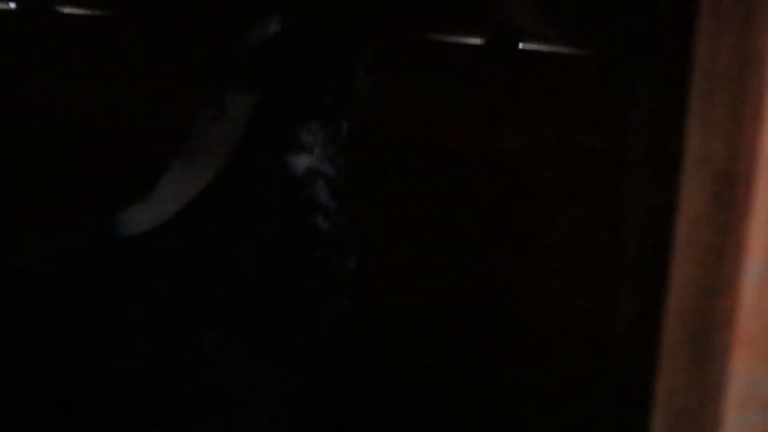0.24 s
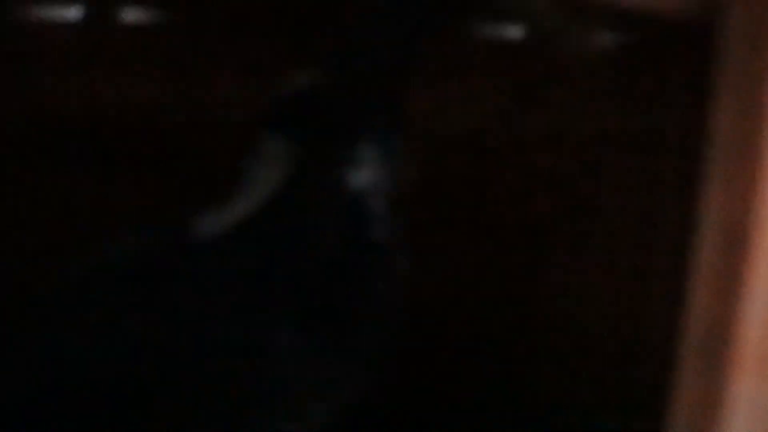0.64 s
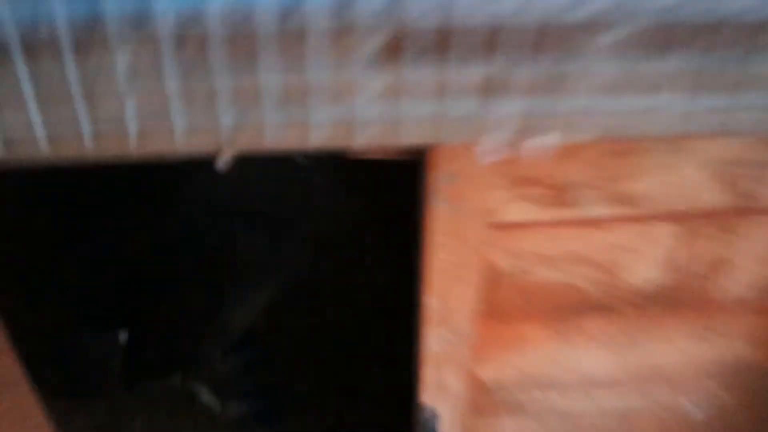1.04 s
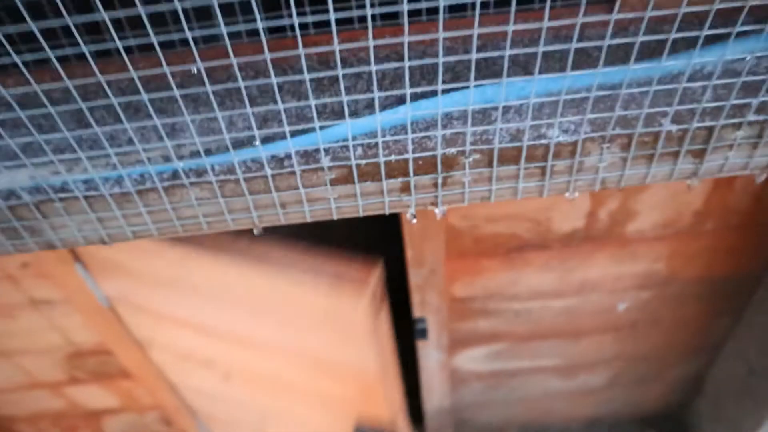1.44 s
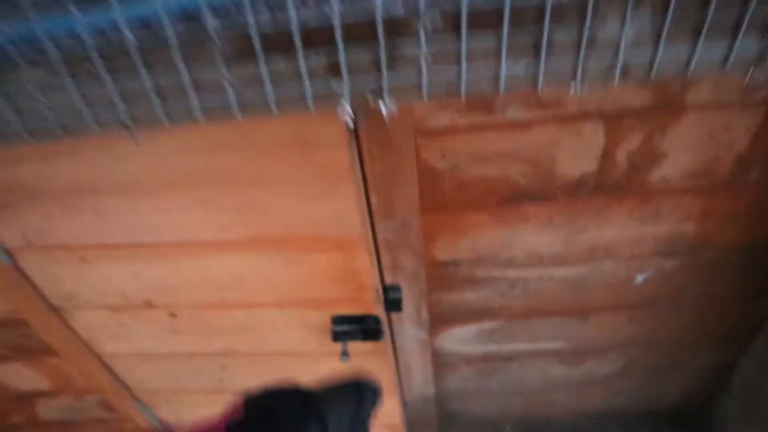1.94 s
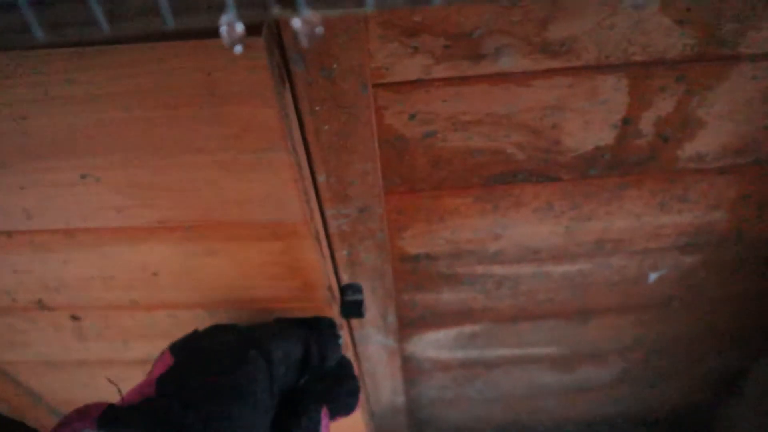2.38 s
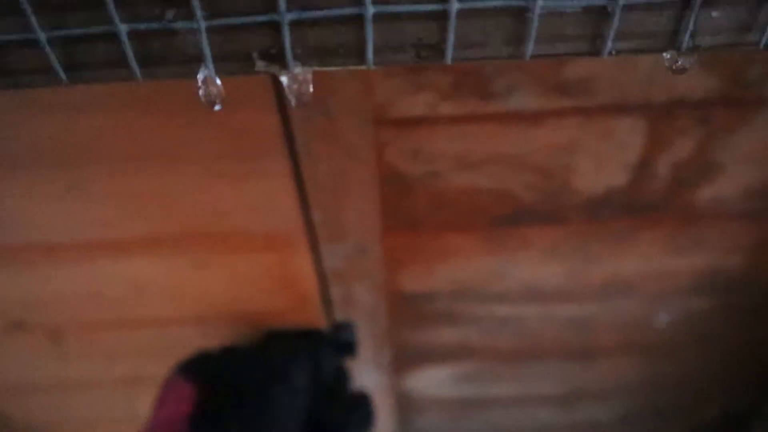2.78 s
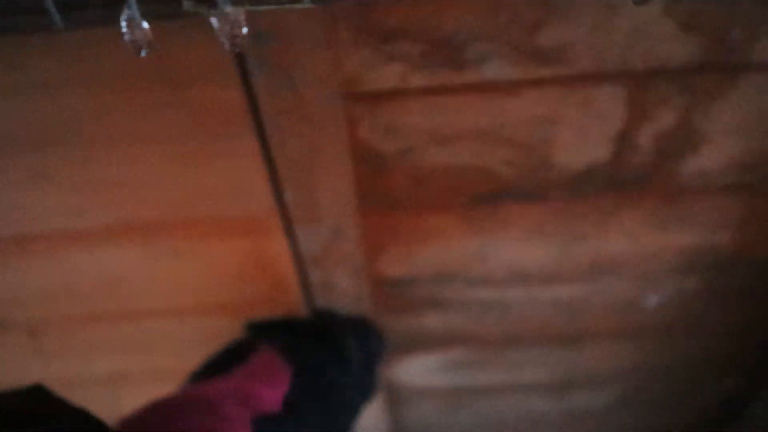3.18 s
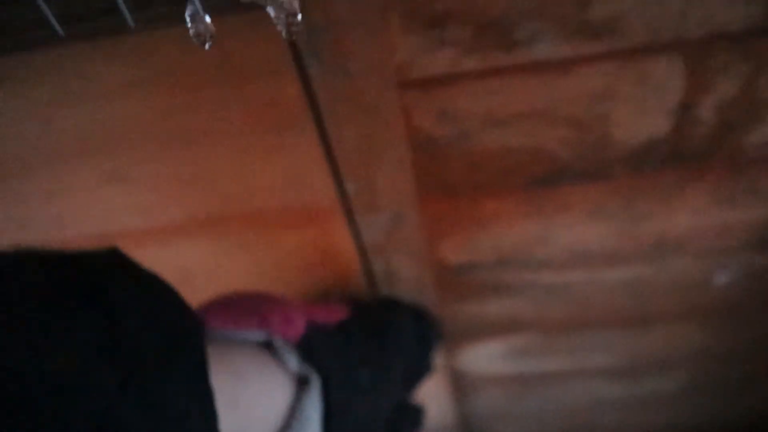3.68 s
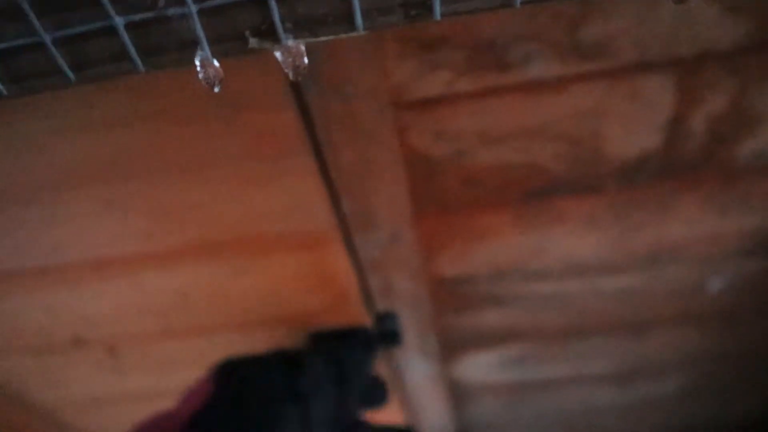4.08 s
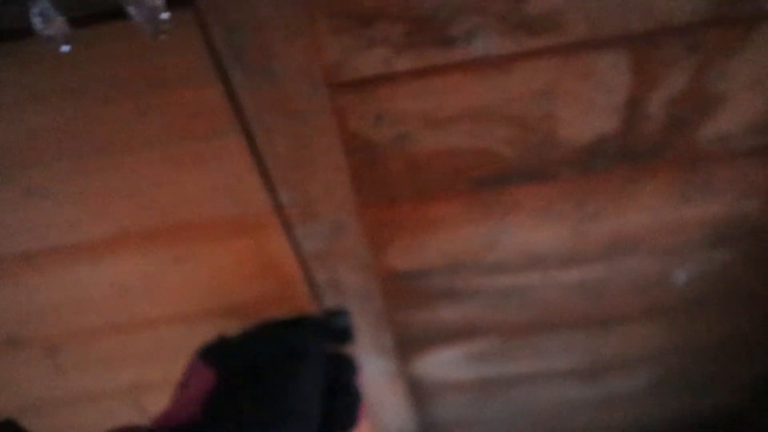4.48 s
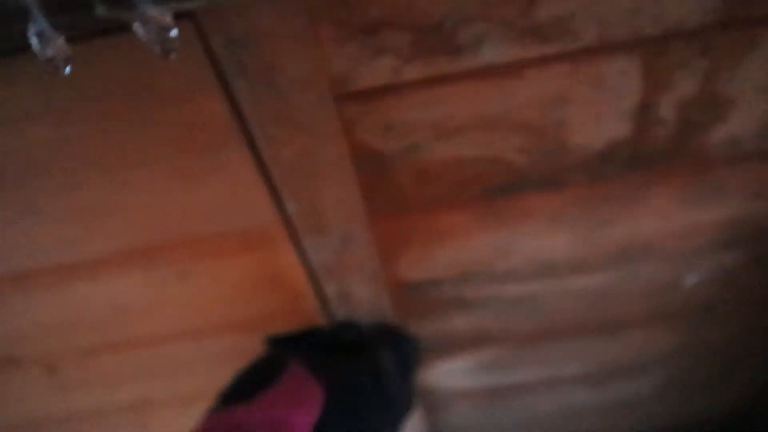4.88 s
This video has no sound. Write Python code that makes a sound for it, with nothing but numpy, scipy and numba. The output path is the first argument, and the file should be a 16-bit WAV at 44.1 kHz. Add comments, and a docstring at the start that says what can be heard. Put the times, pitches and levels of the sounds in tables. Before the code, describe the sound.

Close handheld stereo sound outdoors beside a small wooden duck coop. From the start ducks give short, nasal, buzzing quacks, with small bill smacks, coloured by a boxy wooden resonance and very short tail. Low breeze rumble swells around 0.6 to 1 s, and soft air and faint hiss run throughout. Between about 0.8 and 1.85 s the camera body is bumped repeatedly with dull low knocks, and a sleeve rustles, most clearly near 1.9 s. At about 1.63 s the plank door knocks shut with a hollow double hit. From 2.3 s the quacks become louder, quicker and overlapping, some held longer, near 3.8 and 4.2 s. A sharp latch-and-door clatter comes at 2.5 s. The wall thuds and grinds softly at 2.3, 3.8 and 4.45 s, with a weaker door knock at 4.25 s and a faint bump at 4.7 s. Quacking continues to the end, just past 5 s.

```python
"""Ducks quack inside a small wooden coop: bill smacks, and 65 to 84 syrinx pulses a second that ring
windpipe and bill, coloured by the modes and short tail of the box. A gloved hand knocks door and latch, and
the wall thuds when leaned on. Close to the microphones the camera body is bumped and a sleeve rustles.
Breeze rumble, outdoor air and faint hiss run throughout on a pair of ports widened by a slope difference."""
import sys
import numpy as np
from scipy import signal
from scipy.io import wavfile
from scipy.ndimage import uniform_filter1d
from numba import njit

SR = 44100
rng = np.random.default_rng(int(sys.argv[2]) if len(sys.argv) > 2 else 0)


def wav_out(sig):
    """Save sig, one row per channel (or a flat mono array), as 16-bit PCM at SR to the path in sys.argv[1]."""
    wavfile.write(sys.argv[1], SR, np.round(np.clip(np.atleast_2d(sig).T, -1, 1) * 32767).astype(np.int16))


N = 226089

# All levels are set ahead of the camera's gain and rounding.
# Breeze on the ports: time_s, breeze_db, rumble_over_breeze_db (both flicker around these)
BREEZE = [(0, -51, 1.5), (.6, -43, 2), (.85, -32, 1.5), (1.25, -41.5, -3), (1.65, -37, -5.5),
          (2.05, -45, -18), (3.0, -48.5, -50.5), (4.3, -44.5, -8.5), (5.13, -46, -3)]
# Breeze spectrum: frequency_hz, level_db
BREEZE_COLOUR = [(70, -7), (100, -3), (170, -1), (450, -17)]
# Spectrum of the deepest rumble: frequency_hz, level_db
RUMBLE_COLOUR = [(22, -7), (40, -9.5), (60, 2)]
# Outdoor air spectrum: frequency_hz, relative_level_db
AIR_COLOUR = [(300, -1.5), (600, 8), (800, 25), (1050, 7), (1500, 7.5), (3000, -5), (9000, -22)]
AIR_DB = -48
# Sleeve swishes near the ports: centre_s, half_length_s, level_db
RUSTLES = [(0.887, 0.14, -53.5), (1.288, 0.057, -54.5), (1.882, 0.037, -42.5), (2.28, 0.028, -47),
           (2.928, 0.02, -53.5), (3.596, 0.015, -53.5), (4.44, 0.028, -54), (4.945, 0.49, -63.5)]
# Cloth and hiss spectrum: frequency_hz, level_db
RUSTLE_COLOUR = [(3000, 0), (8000, -8.5), (11000, -1.5), (15000, -21)]
HISS_DB = -62

# Bill smacks: start_s, level_db
SMACKS = [(0.124, -29.5), (0.447, -26.5), (0.697, -25), (1.164, -29), (1.579, -28.5), (1.955, -26.5),
          (2.319, -24), (2.433, -25.5), (2.82, -26.5), (2.948, -25), (3.269, -23.5), (3.426, -25.5),
          (3.765, -24.5), (3.96, -24), (4.209, -22), (4.658, -22), (4.69, -23), (5.084, -27),
          (5.107, -23.5)]
SMACK_HZ = 852.5  # middle of a random spread
# Quacks, which may overlap: start_s, rise_s, hold_s, windpipe_db, drift_over_hold_db,
# windpipe_hz, bill_hz, open_bill_over_windpipe_db, rasp_over_windpipe_db
QUACKS = [ (0.165, 0.14, 0.045, -33.5, -0.5, 1360, 1880, -11.5, -19),
          (.45, 0.023, 0.023, -25, 2.5, 1410, 2020, 2, -18.5),
          (0.698, 0.25, 0.042, -25.5, -7.5, 1249, 1610, -0.5, -14),
          (.705, 0.021, 0.029, -30, 1.5, 1214, 2010, 5.5, -12.5),
          (1.164, 0.059, .006, -25.5, -5, 1430, 1920, -12.5, -19),
          (1.317, 0.039, 0.067, -29, -6, 1395, 1805, 3.5, -8.5),
          (1.397, 0.026, .021, -32, 0.5, 1334, 2165, -0.5, -16),
          (1.582, .035, 0.032, -29, -2, 1415, 1850, 0, -13.5),
          (1.655, 0.12, .025, -30, -7.5, 1430, 1680, -3.5, -15.5),
          (1.892, 0.022, 0.28, -28, 4, 1394, 1910, -4.5, -12.5),
          (2.115, 0.048, 0.023, -31.5, 5.5, 1490, 2150, 9.5, -8),
          (2.326, .035, 0.054, -19.5, -9, 1424, 1810, -1.5, -15.5),
          (2.44, 0.032, 0.12, -18.5, -18, 1454, 2055, 1, -8),
          (2.639, 0.05, 0.042, -22.5, -3, 1442, 2020, -4, -9),
          (2.816, 0.054, 0.04, -24, -10.5, 1388, 1800, -6, -18),
          (2.944, 0.043, 0.082, -22.5, -0.5, 1427, 1835, 2, -10.5),
          (3.13, 0.038, .065, -24, 1, 1384, 1950, 2, -5.5),
          (3.272, 0.038, 0.037, -21.5, -3, 1433, 1990, -4, -14.5),
          (3.432, .03, 0.092, -17, -9.5, 1467, 1964, -4.5, -13.5),
          (3.624, 0.039, 0.048, -24, -2.5, 1410, 1967, 1, -10),
          (3.772, .07, 0.19, -22, -1, 1420, 1830, -10.5, -18.5),
          (3.946, 0.055, 0.039, -29, 0.5, 1398, 1980, 8, -6),
          (4.172, 0.038, 0.043, -20, -4.5, 1410, 1920, 0, -12),
          (4.21, 0.051, 0.19, -25, 2.5, 1380, 1855, -14, -22.5),
          (4.39, 0.025, 0.059, -20, -1, 1385, 1980, 0, -9.5),
          (4.664, 0.052, 0.15, -22, -0.5, 1412, 1850, -0.5, -14),
          (4.848, .035, 0.031, -34.5, -0.5, 1323, 2044, 8, -4),
          (5.096, 0.039, 0.025, -22.5, 5, 1496, 1980, 1.5, -9), ]
# Syrinx pulse rate before jitter: time_s, pulse_rate_hz
SYRINX_RATE = [(.2, 69), (.5, 75.3), (.75, 65), (1.4, 81), (2.7, 84.3), (2.87, 74.6), (3.1, 76.7),
               (3.32, 70), (3.6, 83), (4.3, 70.5), (5.1, 84.3)]
# High cavities of the bill: mean_hz, width_of_each_filter_pass_hz, mean_relative_level_db
RASP_CAVITIES = [(2730, 460, 3), (3470, 246, 0), (3874, 200, 1.5), (4477, 130, 5.5), (5040, 736, -1),
                 (5600, 440, -6)]
ONSET_DB, RELEASE_DB_PER_S = -14, 1000  # level at the start of a quack, speed of its dying
PIPE_HZ_PER_DB, MAX_SAG_DB = 9.5, 2  # windpipe pitch follows the level, at most this far down
OPENING_DB = 6.5  # bill and rasp are this much weaker at both ends of a call
CLOSING_S, SHUT_HZ = 0.019, 152  # bill shuts this long after the hold, its resonance this much lower
# Modes of the wooden box: mean_hz, width_hz, mean_level_over_direct_db
COOP_MODES = [(1057, 180, 12.5), (1247, 53, 0), (1517, 105, 4.5), (1735, 56, 4), (2043, 42, 1.5),
              (2386, 27, 1)]
COOP_GAIN_DB = 3  # boxed calls over bare calls
COOP_T60_S, COOP_WET_DB, COOP_SIDE_DB = 0.06, -8, -11.5

# Soft bumps on the camera body, before port gains and low cut: start_s, peak_db, centre_hz, cycles
BUMPS = [(0.787, -17.5, 139, 0.93), (.889, -13, 146, 0.48), (1.05, -7, 198, 0.66), (1.088, -22, 241, 0.31),
         (1.126, -16.5, 415, 0.9), (1.135, -15.5, 330, 0.58), (1.238, -25, 364, 1.8),
         (1.297, -21.5, 386, 0.81), (1.357, -19, 257, 0.52), (1.393, -21, 426, 0.79),
         (1.432, -11.5, 170, 1.33), (1.449, -7, 236, 0.33), (1.491, -12, 154.7, 0.39),
         (1.733, -7.5, 251, 0.85), (1.744, -8, 407, 0.43), (1.829, -7.5, 343, 0.59), (4.712, -21, 205, 1.2)]
# Door and latch knocks: start_s, plank_db, crack_over_plank_db
KNOCKS = [(1.632, -8, -8.5), (1.642, -25, 4), (1.658, -15, -22), (2.51, -9.5, -2), (2.517, -15.5, -31),
          (2.542, -8, -12), (2.554, -32, 6), (4.256, -18.5, -32)]
# Ringing of the door planks: pitch_hz, level_db, t60_s
DOOR_MODES = [(221.7, -14, 0.16), (332, -2.5, 0.072), (352.2, -21, 0.51), (469, -8, 0.14), (684, -3, 0.028),
              (870, -11.5, 0.061)]
# Thuds of the coop wall, before its low cut: start_s, peak_db, plank_grind_over_thud_db
THUDS = [(1.641, -23, -3), (2.315, -29.5, 3.5), (2.55, -28, 4), (3.079, -43.5, -2.5), (3.815, -31, 1),
         (4.255, -23, 3.5), (4.45, -31, -5.5), (4.711, -37, 12.5)]
WALL_HZ, WALL_WIDTH_HZ, WALL_RING_DB, GRIND_S = 93.3, 5.2, 1, 0.032
TOP_HZ = 15400


def undb(db):
    """Decibels to gain."""
    return 10 ** (np.asarray(db) / 20)


def unit(x):
    """Scale to rms 1."""
    return x / np.sqrt(np.mean(x ** 2))


@njit
def svf(x, hz, width):
    """State-variable band-pass whose centre may move, gain 1 at the centre."""
    y, b, l = np.empty(len(x)), 0., 0.
    for i in range(len(x)):
        g, k = np.tan(np.pi * hz[i] / SR), width / hz[i]
        v = (b + g * (x[i] - l)) / (1 + g * (g + k))
        b, l, y[i] = 2 * v - b, l + 2 * g * v, k * v
    return y


def band(x, hz, width):
    """The band-pass twice, for steep skirts."""
    hz = hz * np.ones(len(x))
    return svf(svf(x, hz, 1. * width), hz, 1. * width)


def low_cut(x, hz):
    """Second-order high-pass."""
    return signal.lfilter(*signal.butter(2, hz, "highpass", fs=SR), x)


def walk(rate):
    """Random levels held 1 / rate s and slewed; spread near 1."""
    k = int(SR / rate)
    steps = np.repeat(rng.standard_normal(N // k + 1), k)
    return 1.2 * uniform_filter1d(steps, k)[:N]


def noise(colour, flicker_db, rate):
    """Coloured noise at rms 1, in half-octave bands that each flicker alone."""
    hz, db = np.transpose(colour)
    centres = np.geomspace(hz[0], hz[-1], int(2 * np.log2(hz[-1] / hz[0])) + 1)
    out = np.zeros(N)
    for f in centres:
        level_db = np.interp(np.log(f), np.log(hz), db) + flicker_db * walk(rate)
        out += undb(level_db) * band(rng.standard_normal(N), f, f / 2)
    return unit(out)


def add(track, s, sound):
    """Mix a short sound in at time s."""
    i = int(s * SR)
    track[..., i:i + sound.shape[-1]] += sound[..., :N - i]


def curve(rows):
    """Columns of a table as straight lines in time."""
    s, *columns = np.transpose(rows)
    return [np.interp(np.arange(N) / SR, s, c) for c in columns]


def slope(x, top_hz=12000):
    """Rate of change, giving a tone a gain equal to its frequency in Hz, softened towards top_hz."""
    return np.gradient(signal.filtfilt(*signal.butter(1, top_hz, fs=SR), x)) * SR / (2 * np.pi)


def ports(mid, side, lead_hz):
    """Sound leads at the left port; its slope is the difference, as strong as the sum at lead_hz."""
    side = side + slope(mid) / lead_hz
    return np.array([mid + side, mid - side])


def pushes(rows):
    """Soft swings that swell and fade, peaking after half the given cycles."""
    out, t = np.zeros(N), np.arange(8000) / SR
    for s, db, hz, cycles in rows:
        age = 2 * hz * t / cycles
        add(out, s, -undb(db) * np.sin(2 * np.pi * hz * t) * age * np.exp(1 - age))
    return out


def breeze():
    """Breeze at the ports: low noise and deep rumble, plus a weak flickering part opposed left and right."""
    breeze_db, rumble_db = curve(BREEZE)
    rumble = undb(rumble_db) * noise(RUMBLE_COLOUR, 2.4, 6)
    opposed = np.array([[.15], [-.15]]) * noise(BREEZE_COLOUR, 9.0, 12)
    return undb(breeze_db) * (noise(BREEZE_COLOUR, 4, 8.5) + rumble + opposed)


def outdoor_air():
    """Steady outdoor air: flickering noise bands, with a separate noise for the width."""
    return undb(AIR_DB) * ports(noise(AIR_COLOUR, 3.55, 30), .5 * noise(AIR_COLOUR, 2.0, 30), lead_hz=5000)


def sleeve():
    """Short swishes of cloth over a faint steady hiss, wide across the ports."""
    t = np.arange(N) / SR
    swishes = sum(undb(db) * np.exp(-((t - s) / half) ** 2) for s, half, db in RUSTLES)
    cloth = ports(noise(RUSTLE_COLOUR, 2.35, 40), 1.8 * noise(RUSTLE_COLOUR, 1.2, 40), lead_hz=8000)
    return (undb(HISS_DB) + swishes) * cloth


def bill_smacks():
    """Each smack rings two fast-dying tones under a short burst of air."""
    out, t = np.zeros(N), np.arange(2000) / SR
    for s, db in SMACKS:
        air = rng.standard_normal(len(t))
        hz = SMACK_HZ * (1 + 0.053 * air[0])  # each smack has its own pitch
        ring = np.sin(2 * np.pi * hz * t) * np.exp(-t / 0.0065)
        lower = 0.63 * np.sin(2 * np.pi * 0.623 * hz * t) * np.exp(-t / 0.0054)
        burst = band(air * np.exp(-t / 0.011), 2930, 2600)
        add(out, s, undb(db) * (ring + lower + burst))
    return out


def effort():
    """Quacks swell, hold and die; overlapping powers add and the louder call dominates the resonances."""
    pipe, bill, rasp = np.full((3, N), 1e-9)  # powers
    pipe_hz, bill_hz = 1400 * pipe, 1900 * bill  # pitches weighted by power
    for s, rise_s, hold_s, db, drift_db, low_hz, high_hz, bill_db, rasp_db in QUACKS:
        age = np.arange(int((rise_s + hold_s + 80 / RELEASE_DB_PER_S) * SR)) / SR
        onset_db = ONSET_DB * np.clip(1 - age / rise_s, 0, 1) ** 2
        held_db = drift_db * np.clip((age - rise_s) / hold_s, 0, 1)
        release_db = RELEASE_DB_PER_S * np.maximum(age - rise_s - hold_s, 0)
        shape_db = onset_db + held_db - release_db
        # 1 at both ends of the call, 0 with the bill open in the middle
        shut = np.cos(np.pi * np.minimum(age / (rise_s + hold_s + CLOSING_S), 1)) ** 2
        power = undb(db + shape_db) ** 2
        bill_power = power * undb(bill_db - OPENING_DB * shut) ** 2
        add(pipe, s, power)
        add(bill, s, bill_power)
        add(rasp, s, power * undb(rasp_db - OPENING_DB * shut) ** 2)
        add(pipe_hz, s, power * (low_hz + PIPE_HZ_PER_DB * np.maximum(shape_db, -MAX_SAG_DB)))
        add(bill_hz, s, bill_power * (high_hz - SHUT_HZ * shut))
    return np.sqrt(pipe), pipe_hz / pipe, np.sqrt(bill), bill_hz / bill, np.sqrt(rasp)


def syrinx(jitter, size_db):
    """Pulses at the syrinx rate, uneven in timing (periods) and size (dB)."""
    chance = rng.standard_normal((600, 2))
    cycles = np.cumsum(curve(SYRINX_RATE)[0]) / SR
    at = np.searchsorted(cycles, np.arange(600) + np.cumsum(jitter * chance[:, 0]))
    pulses = np.zeros(N + 1)  # the last slot catches pulses past the end
    np.add.at(pulses, at, undb(size_db * chance[:, 1]))
    return pulses[:N]


def puffed(pulses, puff_db, puff_s):
    """A decaying puff of noisy air follows each pulse."""
    puff = signal.lfilter([1], [1, -np.exp(-1 / (puff_s * SR))], pulses)
    return pulses + undb(puff_db) * puff * rng.standard_normal(N)


def quacks():
    """Syrinx pulses ring the windpipe, the open bill and the bill's high cavities."""
    pipe_gain, pipe_hz, bill_gain, bill_hz, rasp_gain = effort()
    pulses = syrinx(jitter=.025, size_db=1.5)
    # four band-pass stages give each pulse a slow, rounded swell
    windpipe = band(band(puffed(pulses, -28, .005), pipe_hz, 300), pipe_hz, 300)
    windpipe = unit(signal.sosfilt(signal.butter(6, 1060, "highpass", fs=SR, output="sos"), windpipe))
    buzz = puffed(pulses, -15, .008)
    bill = unit(band(band(buzz, bill_hz, 890), bill_hz, 890))
    airy = puffed(pulses, 0.5, 0.0095)
    rasp = np.zeros(N)
    # the small cavities come and go as tongue and bill move
    for hz, width, db in RASP_CAVITIES:
        rasp += undb(db + 2 * walk(14)) * band(airy, hz * (1 + .02 * walk(8)), width)
    return pipe_gain * windpipe + bill_gain * bill + rasp_gain * unit(rasp)


def coop(x):
    """The wooden box favours its own modes and adds a dense short tail, partly from the sides."""
    t = np.arange(8000) / SR
    tails = rng.standard_normal((2, len(t))) * np.exp(-np.log(1000) * t / COOP_T60_S)
    tails /= np.sqrt(np.sum(tails ** 2, axis=1, keepdims=True))
    boxed = x.copy()
    # the ducks shuffle about, so each mode is stirred more or less
    for hz, width, db in COOP_MODES:
        boxed += undb(db + 2 * walk(7)) * svf(x, hz * (1 + .012 * walk(9)), 1. * width)
    boxed *= undb(COOP_GAIN_DB) * np.std(x) / np.std(boxed)
    mid, side = (signal.fftconvolve(boxed, tail)[:N] for tail in tails)
    return boxed + undb(COOP_WET_DB) * mid, undb(COOP_SIDE_DB) * slope(side) / 1500


def camera_bumps():
    """Soft knocks on the body; the hand holds the camera next to the left port, so left is stronger."""
    return np.array([[1.5], [.6]]) * low_cut(pushes(BUMPS), 60)


def door():
    """Each knock rings the planks afresh and cracks; the frame rattles briefly."""
    out, t = np.zeros(N), np.arange(14000) / SR
    for s, db, crack_db in KNOCKS:
        ring = np.zeros(len(t))
        for hz, mode_db, t60 in DOOR_MODES:
            phase = np.pi * rng.random()
            ring += undb(mode_db) * np.sin(2 * np.pi * hz * t + phase) * np.exp(-np.log(1000) * t / t60)
        air = rng.standard_normal(len(t))
        rattle = undb(6) * band(air * np.exp(-t / 0.014), 1040, 1950)
        crack_fade = np.exp(-t / 0.0018) + 0.067 * np.exp(-t / .008)
        crack = undb(crack_db) * band(air * crack_fade, 2670, 11000)
        add(out, s, undb(db) * (ring * np.minimum(t / 0.0027, 1) + rattle + crack))
    return out


def wall():
    """Leaned on, the wall shudders, grinds its loose planks and booms on at its own pitch."""
    thuds = pushes([(s, db, WALL_HZ, 2.2) for s, db, _ in THUDS])
    boom = undb(WALL_RING_DB) * svf(thuds, WALL_HZ * np.ones(N), 1. * WALL_WIDTH_HZ)
    grind, age = np.zeros(N), np.arange(12000) / SR / GRIND_S
    for s, db, grind_db in THUDS:
        add(grind, s, undb(db + grind_db) * age * np.exp(1 - 2 * age))
    grit = unit(band(rng.standard_normal(N), 190, 310)) * undb(1.86 * walk(90))
    shudder = thuds * (1 + 0.37 * walk(250))
    return low_cut(shudder + boom + grind * grit, 55)


def scene():
    """Ducks in the box, door and wall, with handling, breeze and outdoor air at the ports."""
    mid, side = coop(quacks())
    front = ports(mid + bill_smacks() + door() + wall(), side, lead_hz=3520)
    return front + camera_bumps() + breeze() + sleeve() + outdoor_air()


def record(dry):
    """The camera lifts the level, rounds the loudest peaks and cuts the top."""
    top_cut = signal.ellip(8, .2, 70, TOP_HZ, fs=SR, output="sos")
    return signal.sosfilt(top_cut, np.tanh(0.98 * dry) / 0.72)


dry = scene()
out = record(dry)
wav_out(out)
```